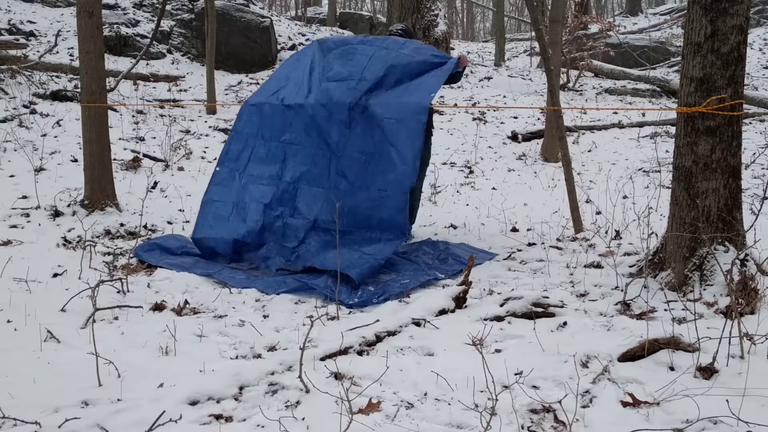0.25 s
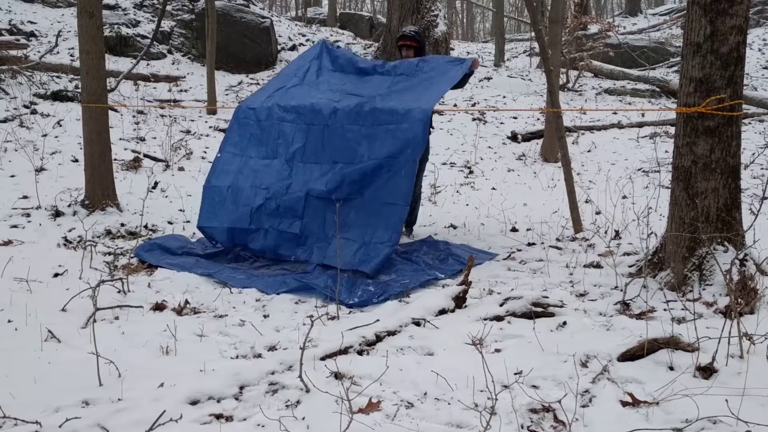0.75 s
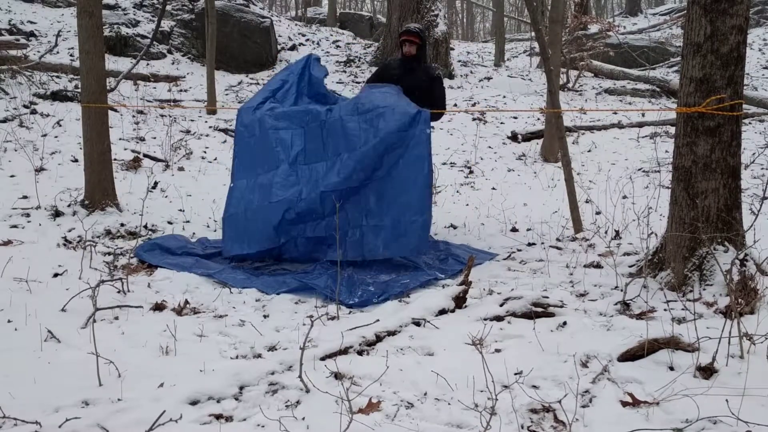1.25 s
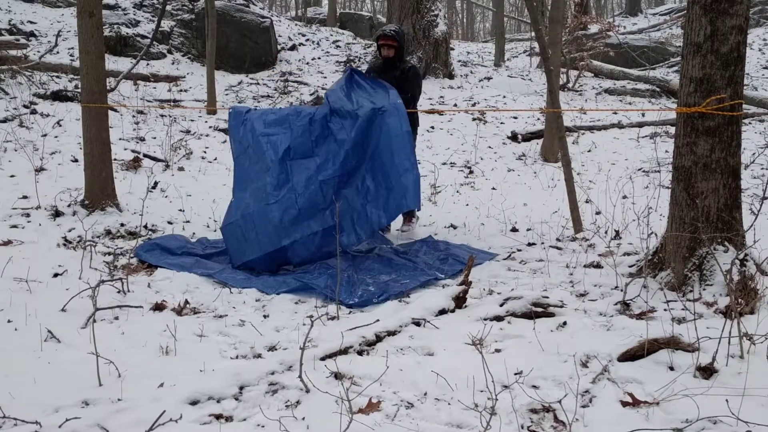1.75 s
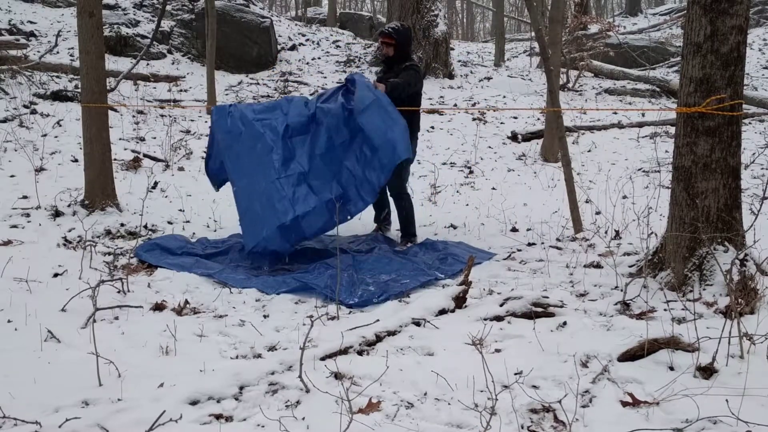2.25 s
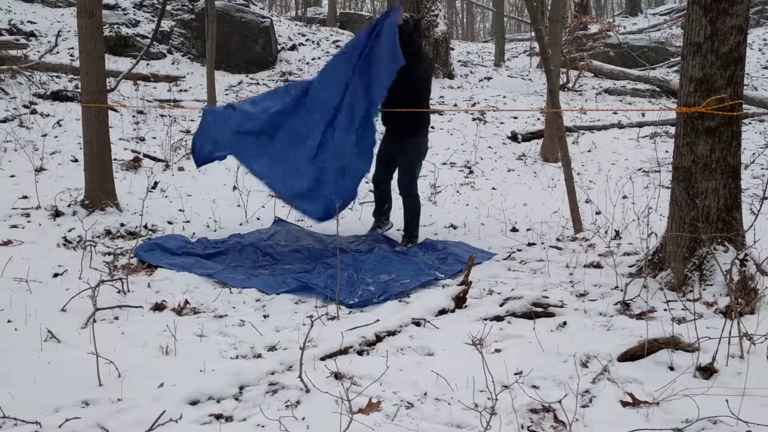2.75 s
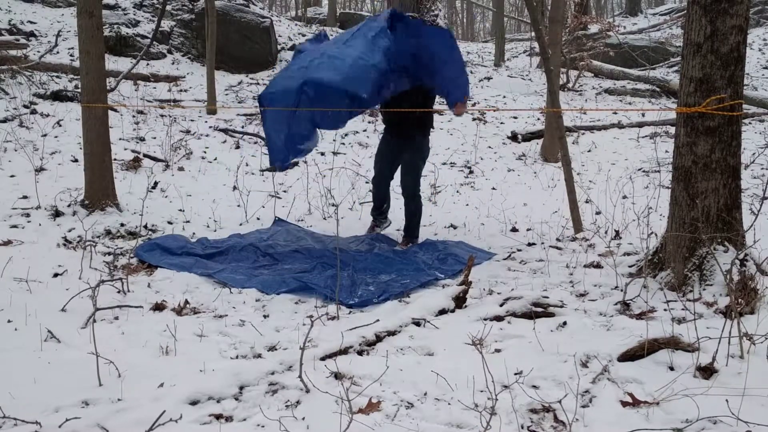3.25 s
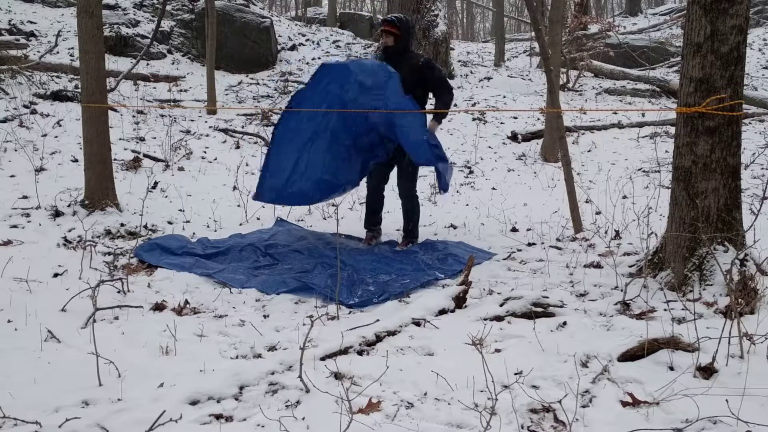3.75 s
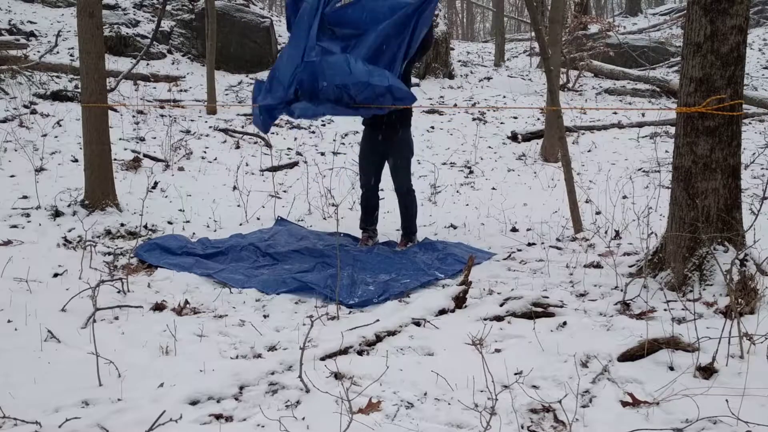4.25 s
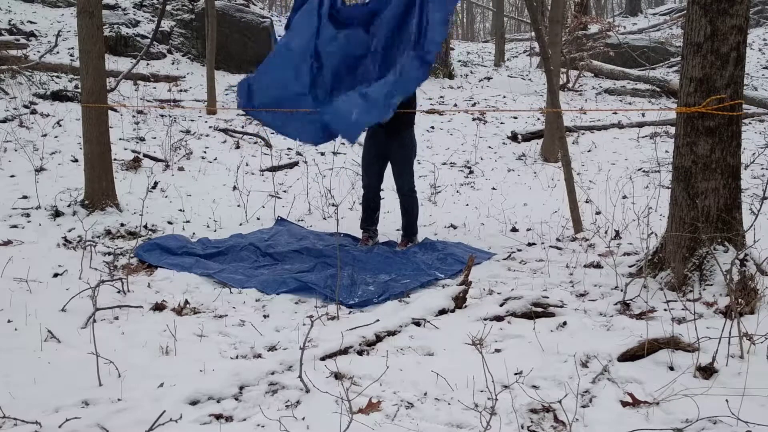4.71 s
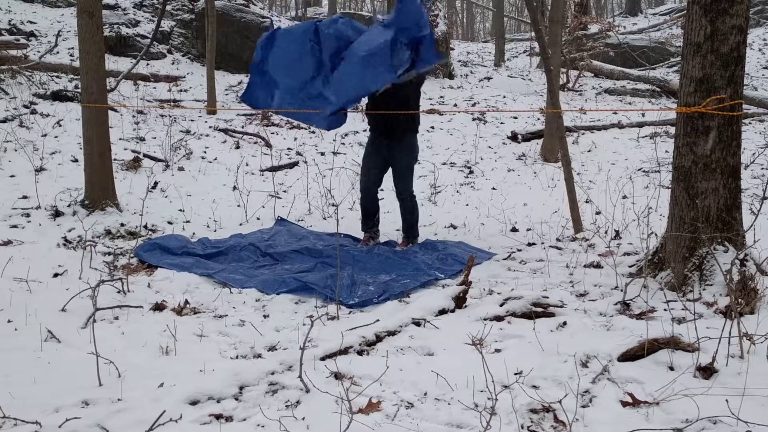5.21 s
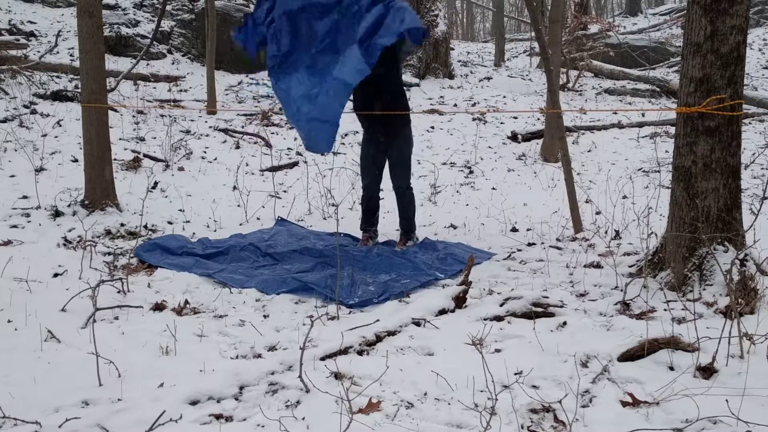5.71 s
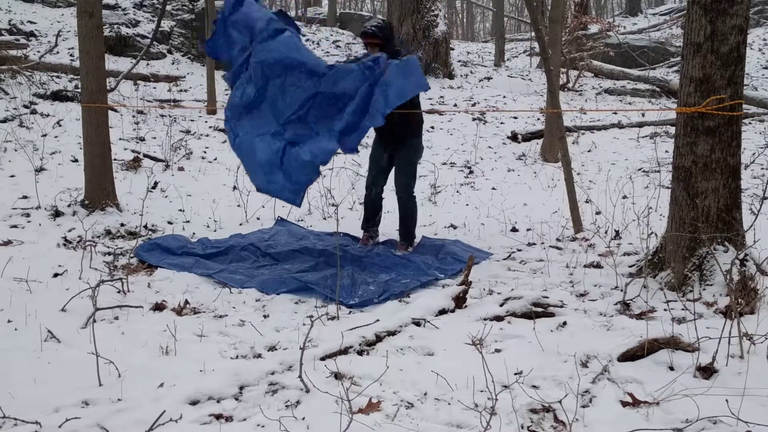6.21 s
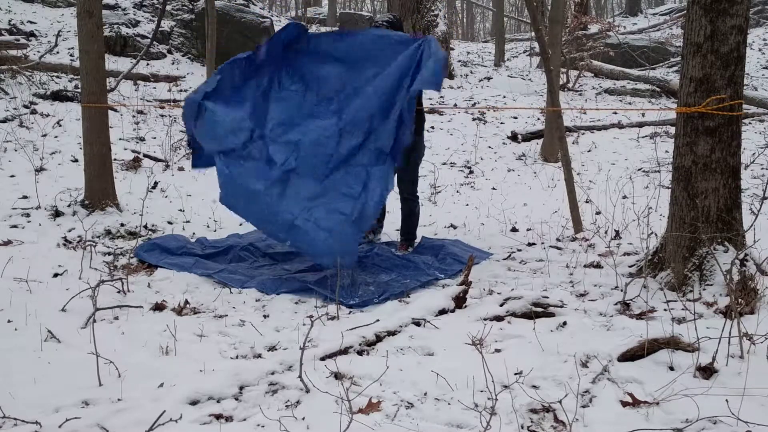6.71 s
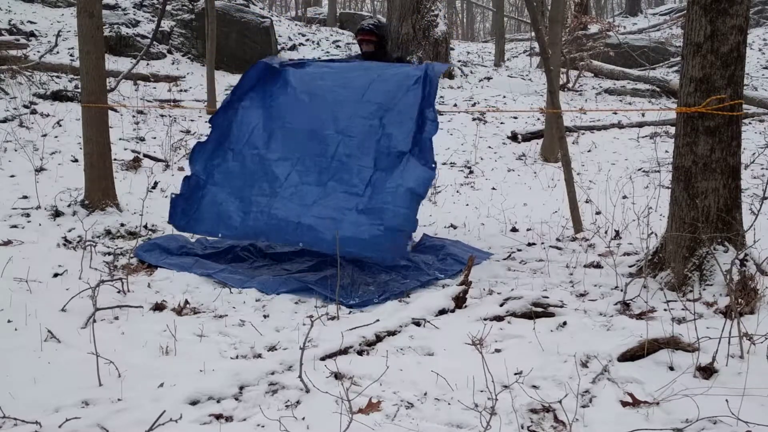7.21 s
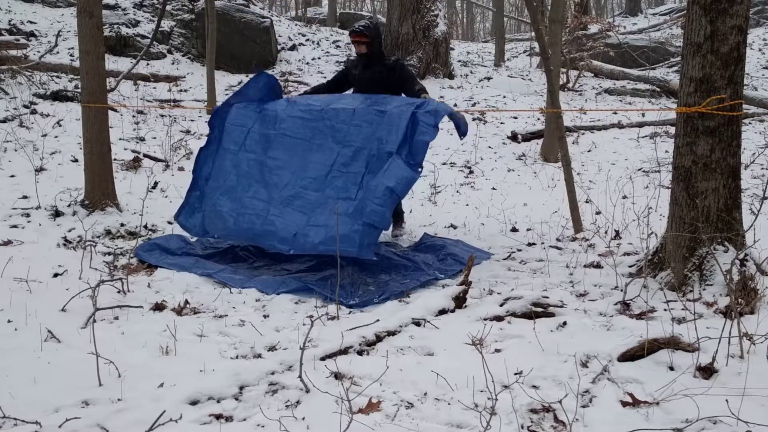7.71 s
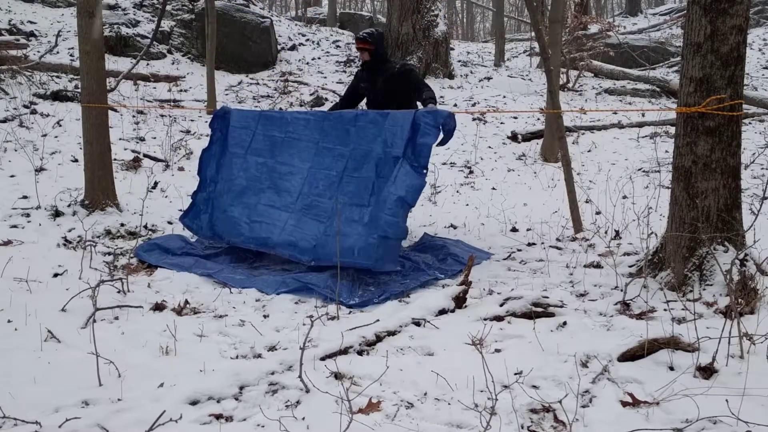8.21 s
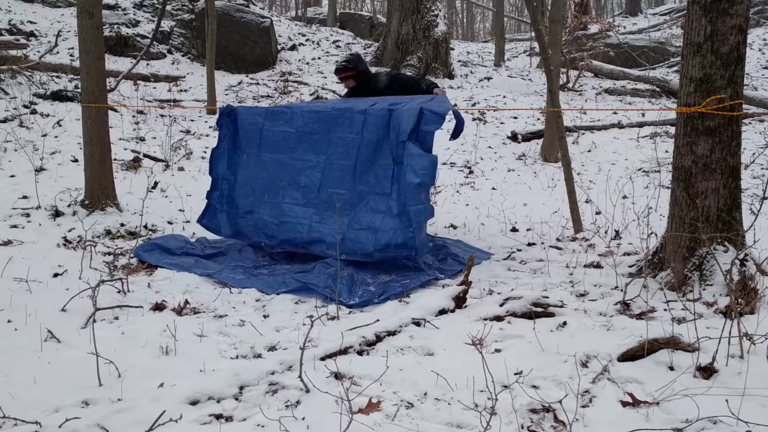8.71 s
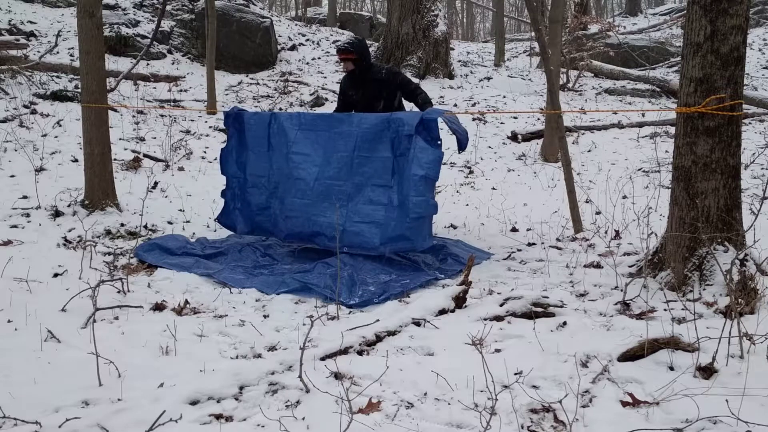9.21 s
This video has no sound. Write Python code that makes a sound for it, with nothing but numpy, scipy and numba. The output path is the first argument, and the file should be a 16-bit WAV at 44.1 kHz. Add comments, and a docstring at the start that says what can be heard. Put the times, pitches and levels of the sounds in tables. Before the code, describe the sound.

A stiff plastic tarp is handled several metres away in a snowy wood, making a dense, crisp crinkle with little bass and scattered sharp snaps. It starts with quick rustling tugs and a cluster of snaps around 0.4 seconds, then eases near 1 second. Stronger swells come at about 2.1 and 2.7 seconds as the tarp is shaken out. A sharp crack at 3.7 seconds leads into the loudest surge at 4 seconds. Uneven shakes continue, swelling around 4.7, 5.6 and 6.5 seconds. From 7 to 8.5 seconds the rustle thins to softer crinkles and separate ticks as the tarp settles over a line. Fresh tugs and snaps arrive at 8.7 seconds and again from 9 to about 9.5 seconds. Tree trunks return a short echo, while a low rumble of distant traffic and a faint hiss continue throughout.

```python
"""A stiff woven-plastic tarp is shaken out and hung over a line in a snowy wood, some metres away.
Thousands of small creases buckle, each a click that rings its facet for a few cycles;
big folds snap out of the crowd. The trunks return a short echo; far traffic rumbles underneath."""
import sys
import numpy as np
from scipy import signal
from scipy.fft import rfft, irfft
from scipy.io import wavfile
from scipy.ndimage import uniform_filter1d
from numba import njit

SR = 44100
rng = np.random.default_rng(int(sys.argv[2]) if len(sys.argv) > 2 else 0)


def master_out(mix):
    """Clip the mix to full scale and print it as 16-bit PCM to the path in sys.argv[1]."""
    frames = np.transpose(np.atleast_2d(mix))
    ceiling = np.clip(frames, -1, 1)
    pcm = np.round(ceiling * 32767).astype(np.int16)
    wavfile.write(sys.argv[1], SR, pcm)


N = 417186


def undb(db):
    """dB to gain."""
    return 10 ** (np.asarray(db) / 20)


def on_log(hz, table):
    """Interpolate (Hz, dB) points on a log-frequency axis."""
    table_hz, db = np.transpose(table)
    return np.interp(np.log(hz), np.log(table_hz), db)


def walk(rate_hz):
    """Random steps, smoothed twice; spread near 1."""
    hold = int(SR / rate_hz)
    steps = np.repeat(rng.standard_normal(N // hold + 1), hold)
    return 1.13 * uniform_filter1d(uniform_filter1d(steps, hold), hold)[:N]


@njit
def ring(start_s, hz, cycles, gain, phase_turns):
    """Sum of damped sines, each falling 40 dB over its cycles."""
    out = np.zeros(N)
    for g in range(len(start_s)):
        first, length = int(start_s[g] * SR), int(cycles[g] * SR / hz[g]) + 2
        pole = np.exp(2j * np.pi * hz[g] / SR - np.log(100) / length)
        phasor = gain[g] * np.exp(2j * np.pi * phase_turns[g])
        for k in range(first, min(first + length, N)):
            out[k] += phasor.imag
            phasor *= pole
    return out


def handling(at_s):
    """Steady handling plus tugs that swell fast and die slower: level, brightness and billow in dB."""
    # Each row: time in seconds, then crinkle level, thin-crease brightness, panel billow in relative dB.
    steady = [(0.0, -31.8, -9.3, -10), (0.5, -39.2, -8.6, -10), (1.0, -44.6, -8.4, -10),
              (1.49, -37.7, -9.2, -10), (1.99, -32.4, -7.9, -12), (2.49, -51.5, -10.1, -12),
              (2.99, -32.7, -11.7, -9), (3.48, -31.2, -10.3, -8), (3.98, -35.9, -10.1, -9),
              (4.48, -42.3, -11.6, -8), (4.98, -36.9, -10.5, -8), (5.48, -37.4, -10.3, -7),
              (5.97, -40.6, -9.2, -8), (6.47, -43.8, -10.5, -9), (6.97, -41.1, -8.1, -11),
              (7.47, -43, -8.5, -11), (7.97, -56, -7.1, -11), (8.46, -44.8, -10.8, -10),
              (8.96, -60, -8.1, -12), (9.46, -31.2, -7.2, -14)]
    # Each row: peak in seconds, level in relative dB, half-power length in ms, brightness in relative dB.
    tugs = [(0.164, -34.3, 43, -8.0), (0.329, -31.1, 35, -8.5), (0.421, -36.9, 245, -9.3),
            (0.442, -29.9, 25, -6.6), (0.562, -31.5, 80, -6.6), (0.71, -34.5, 28, -9.7),
            (0.825, -38.5, 28, -10.2), (1.054, -42.9, 16, -11.9), (1.128, -41.1, 58, -11.4),
            (1.308, -36.2, 105, -10.0), (1.412, -36.6, 17, -6.4), (1.657, -35.4, 30, -9.3),
            (1.858, -34.4, 85, -7.8), (2.112, -28.2, 41, -8.0), (2.199, -31.8, 143, -9.1),
            (2.445, -35.8, 18, -10.7), (2.475, -38.1, 118, -9.5), (2.679, -27.6, 89, -8.3),
            (2.773, -25.7, 161, -9.1), (3.326, -33.3, 32, -10.9), (3.999, -25.0, 302, -10.3),
            (4.003, -23.9, 42, -6.3), (4.205, -27.5, 46, -9.5), (4.534, -32.4, 204, -9.1),
            (4.732, -32.3, 152, -9.2), (4.821, -36.0, 15, -9.9), (5.123, -30.4, 90, -14.0),
            (5.453, -33.6, 58, -5.0), (5.578, -29.5, 187, -8.7), (5.594, -29.3, 45, -10.1),
            (5.812, -35.3, 122, -10.2), (5.934, -35.6, 50, -10.0), (5.982, -33.6, 18, -11.7),
            (6.065, -40.2, 32, -7.1), (6.108, -38.0, 27, -7.6), (6.238, -41.3, 39, -6.2),
            (6.306, -35.0, 56, -9.8), (6.472, -30.2, 81, -12.4), (6.55, -32.2, 224, -8.4),
            (7.051, -40.2, 78, -10.3), (7.154, -37.3, 33, -7.0), (7.358, -39.2, 35, -13.0),
            (7.681, -41.6, 17, -7.5), (7.724, -42.3, 18, -6.5), (7.859, -40.4, 20, -10.0),
            (7.869, -42.6, 268, -8.8), (8.013, -42.1, 28, -7.8), (8.17, -48.8, 19, -8.7),
            (8.302, -44.9, 63, -8.3), (8.42, -42.5, 12, -10.3), (8.528, -43.5, 39, -10.1),
            (8.661, -36.8, 142, -9.9), (8.709, -31.3, 21, -7.2), (8.857, -37.3, 47, -8.7),
            (9.072, -33.7, 210, -10.7), (9.242, -34.7, 40, -6.7)]
    t = np.arange(N * 1000 // SR + 2) / 1000
    knot_s, *columns = np.transpose(steady)
    steady_db, steady_bright_db, billow_db = (np.interp(t, knot_s, c) for c in columns)
    peak_s, tug_db, length_ms, tug_bright_db = np.transpose(tugs)[:, :, None]
    half_s = length_ms / 1000 * np.where(t < peak_s, .4, .6)
    tug_power = undb(2 * tug_db) * .5 ** (((t - peak_s) / half_s) ** 2)
    steady_power = undb(2 * steady_db)
    power = steady_power + tug_power.sum(axis=0)
    bright_db = (steady_power * steady_bright_db + (tug_power * tug_bright_db).sum(axis=0)) / power
    return [np.interp(at_s, t, c) for c in (10 * np.log10(power), bright_db, billow_db)]


def crinkle(max_creases_per_s=22000, busy_db=-32.5, lead_db=2.5, lead_width_oct=.63):
    """Creases buckle at random; handling sets how many, how hard, and which sizes lead."""
    # Base spectrum of the sheet. Each row: frequency in Hz, density in relative dB.
    sheet = [(250, -35), (430, -3), (870, -3.5), (1300, 2.5), (2700, 2.5), (5600, 0.5), (8000, -5.5),
             (11500, -12.5), (16000, -12.5)]
    count = int(max_creases_per_s * N / SR)
    u_time, u_pitch, u_cycles, u_size, u_buckle, u_sign = rng.random((count, 6)).T
    start_s = u_time * N / SR
    hz = (16 + 110 * u_pitch) ** 2  # small, high creases outnumber large ones
    cycles = 3.5 + 9 * u_cycles ** 2
    level_db, bright_db, billow_db = handling(start_s)
    effort_db = level_db - busy_db
    share = np.clip(undb(effort_db), .21, 1)  # gentle handling buckles fewer
    billow_db = billow_db - .5 * effort_db  # large panels lag as the crinkle grows
    small = np.clip(np.log2(hz / 4000) / 1.15, 0, 1)
    large = np.clip(np.log2(1500 / hz) / .74, 0, 1)
    colour_db = on_log(hz, sheet) + small * (bright_db + 12) + large * (billow_db + 9)
    lead_hz = 2800 * 2 ** (.02 * effort_db)  # harder handling favours smaller facets
    colour_db += lead_db * np.exp(-(np.log2(hz / lead_hz) / lead_width_oct) ** 2)
    clump_db = 1.5 * walk(45) + .72 * walk(160)
    clump_db = clump_db[(start_s * SR).astype(int)] * (1 - .6 * large)
    spread_db = np.clip(3 - .033 * effort_db, .5, 4)  # hard shaking evens the sizes out
    size_db = np.minimum(-spread_db * np.log(1 - u_size), 12)
    size_db += 10 * np.log10(1 - spread_db * np.log(10) / 10)  # offsets the spread's added power
    gain = undb(colour_db + level_db + clump_db + size_db) * (u_buckle < share)
    gain *= (hz / 3000) ** .75 / np.sqrt(share * cycles)  # offsets crease density and ring length
    return undb(4.5) * ring(start_s, hz, cycles, gain, .5 * (u_sign > .5))


def trunk_echo(tarp, level_db=-8.5, t60_s=.52, rise_s=.00091, frame=4096):
    """Trunks scatter the sound; the sheet moves, so each frame meets another set of paths."""
    t = np.arange(3 * frame) / SR
    starts = np.arange(-frame // 2, N, frame // 2)
    envelope = undb(-60 * t / t60_s) * (1 - np.exp(-t / rise_s))
    tails = signal.lfilter([1], [1, -.3], rng.standard_normal((len(starts), len(t))) * envelope)
    tails /= np.sqrt(np.sum(tails ** 2, axis=1, keepdims=True))
    frames = np.pad(tarp, frame)[starts[:, None] + frame + np.arange(frame)] * np.hanning(frame)
    echoes = irfft(rfft(frames, 4 * frame) * rfft(tails, 4 * frame))
    out = np.zeros(N + 5 * frame)
    for start, echo in zip(starts, echoes):
        out[start + frame:start + 5 * frame] += echo
    return undb(level_db) * out[frame:frame + N]


def far_traffic(rms_db=-42.5, swell_db=.7):
    """Distant traffic and air: a gently swelling rumble under a faint rush."""
    # Each row: frequency in Hz, density in relative dB.
    spectrum = [(12, -50), (25, -24), (40, 3.5), (55, 11.5), (75, 7.5), (110, 3.5), (170, -6), (300, -13),
                (900, -9.5), (2500, -20.5), (8000, -30.5), (16000, -43.5)]
    hz = np.maximum(np.fft.rfftfreq(N, 1 / SR), 1)
    rumble = irfft(rfft(rng.standard_normal(N)) * undb(on_log(hz, spectrum)), N)
    return rumble / np.std(rumble) * undb(rms_db + swell_db * walk(2))


def fold_snaps(cracks=3, gap_s=.0012):
    """A fold gives way: a sharp edge and the ring of its facet, then weaker after-cracks."""
    # Each row: start in seconds, facet peak in relative dB, facet pitch in Hz,
    # edge peak in relative dB, facet ring in cycles.
    folds = [(0.2795, -19, 3530, -29, 10), (0.3945, -15, 3360, -30, 10), (0.444, -9, 3000, -17, 7.3),
             (0.553, -15, 3300, -24, 8), (0.8131, -26, 2220, -31, 10), (1.0223, -25, 4820, -29, 10),
             (1.1293, -18, 3210, -39, 10), (1.2547, -18, 3770, -35, 10), (1.915, -19, 2500, -29, 8),
             (1.9404, -14, 3360, -23, 10), (2.096, -20, 2000, -27, 15), (2.297, -21, 3000, -36, 25),
             (2.3223, -18, 5710, -34, 10), (2.447, -21, 3720, -38, 34), (3.7345, -10, 6590, -19, 11),
             (4.0225, -17, 5470, -22, 20), (4.114, -15, 2920, -28, 14), (4.882, -21, 1660, -23, 10),
             (5.133, -13, 3450, -30, 10), (5.8447, -18, 2190, -30, 12), (5.984, -24, 1320, -36, 25),
             (6.604, -22, 3010, -26, 10), (6.908, -24, 2670, -31, 10), (7.152, -17, 5360, -27, 11),
             (7.3456, -19, 3230, -33, 10), (7.3659, -18, 2970, -33, 10), (7.5735, -22, 6360, -32, 10),
             (7.6797, -21, 7130, -31, 10), (7.726, -24, 2230, -24, 10), (7.7505, -28, 2710, -27, 8.8),
             (7.911, -22.5, 880, -45, 6.1), (8.3435, -27, 4610, -36, 10), (8.4198, -22.5, 2630, -34, 11),
             (8.5387, -25, 3700, -33, 10), (8.6247, -17, 3080, -33, 10), (8.6715, -12, 5400, -25, 10),
             (8.7081, -16, 3580, -17, 10), (8.713, -20, 2270, -34, 22), (8.8311, -30, 3540, -26, 25),
             (8.8553, -21, 3450, -27, 30), (8.963, -23, 3810, -32, 10), (9.0025, -22, 3670, -41, 28),
             (9.0339, -16, 3530, -31, 28), (9.246, -21, 3140, -34, 22), (9.3679, -17, 5400, -23, 10)]
    start_s, facet_db, hz, edge_db, cycles = np.repeat(folds, cracks, axis=0).T
    u_time, u_fade, u_pitch = rng.random((len(hz), 3)).T
    order = np.tile(np.arange(cracks), len(folds))
    start_s = start_s + gap_s * order * (.5 + u_time)
    fade_db = -order * (5 + 3 * u_fade)
    phase_turns = .5 * (u_fade > .5)
    facet_hz = hz * 2 ** (.26 * order * (u_pitch - .5))
    edge_hz = 7000 + 6000 * u_pitch
    facet = ring(start_s, facet_hz, cycles, undb(facet_db + fade_db), phase_turns)
    edge = ring(start_s, edge_hz, np.full(len(hz), 4.5), undb(edge_db + fade_db), phase_turns)
    return undb(-5) * facet + undb(6.5) * edge


def scene(low_cut_hz=289):
    """Tarp, echo and traffic; one microphone feeds both channels."""
    # air slips round a thin sheet, so it radiates little bass
    low_cut = signal.butter(3, low_cut_hz, "high", fs=SR, output="sos")
    tarp = signal.sosfilt(low_cut, crinkle() + fold_snaps())
    return np.tile(tarp + trunk_echo(tarp) + far_traffic(), (2, 1))


def record(dry):
    """White microphone hiss, then a steep low-pass."""
    hiss_db, top_hz = -58, 15770
    heard = dry + undb(hiss_db) * rng.standard_normal(N)
    return signal.sosfilt(signal.ellip(14, .3, 80, top_hz, fs=SR, output="sos"), heard)


dry = scene()
out = record(dry)
master_out(out)
```